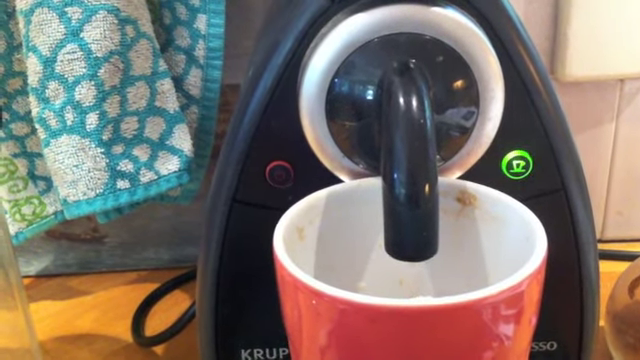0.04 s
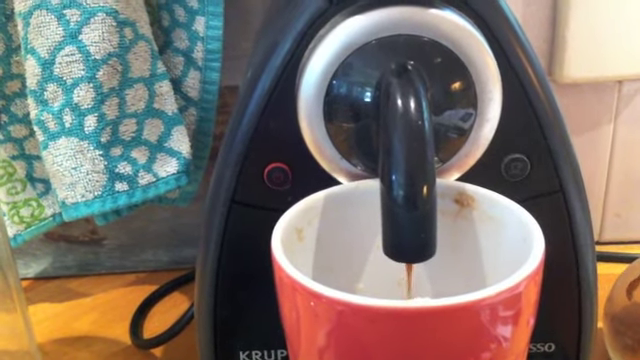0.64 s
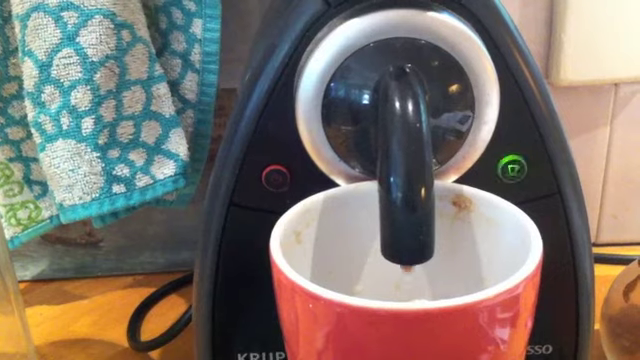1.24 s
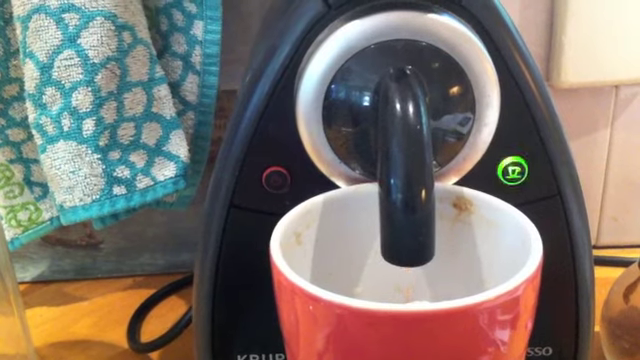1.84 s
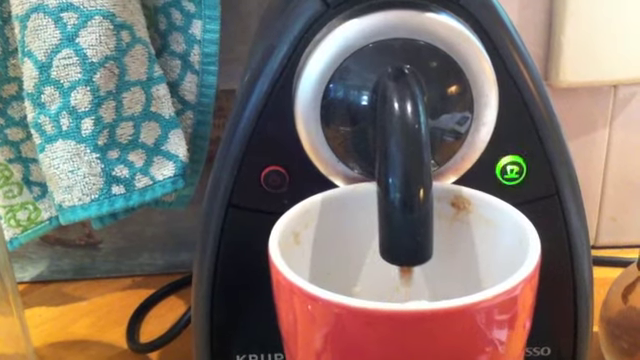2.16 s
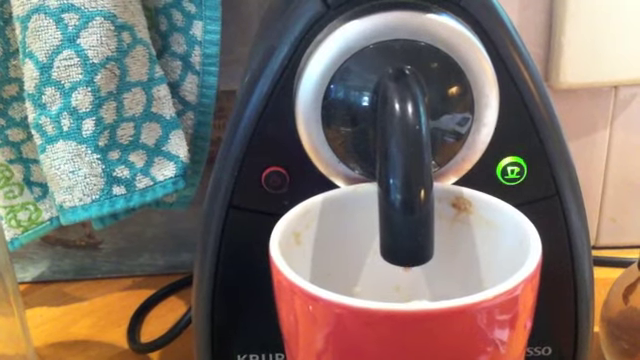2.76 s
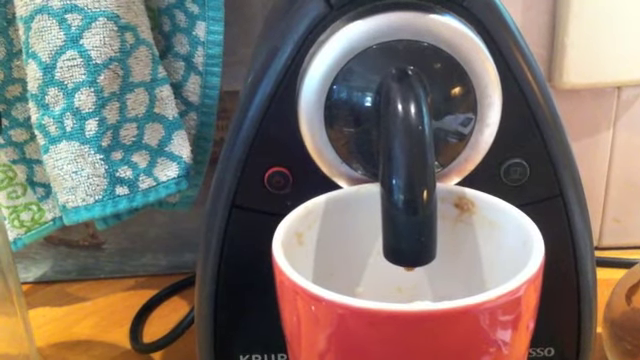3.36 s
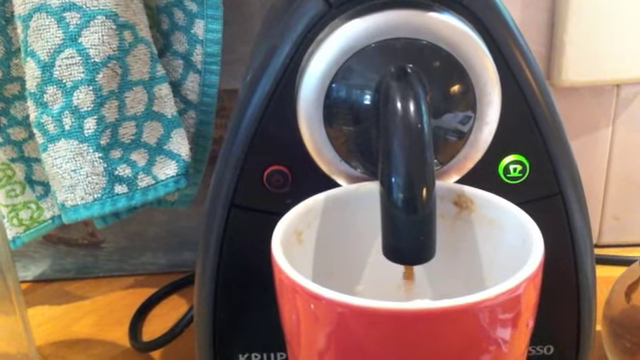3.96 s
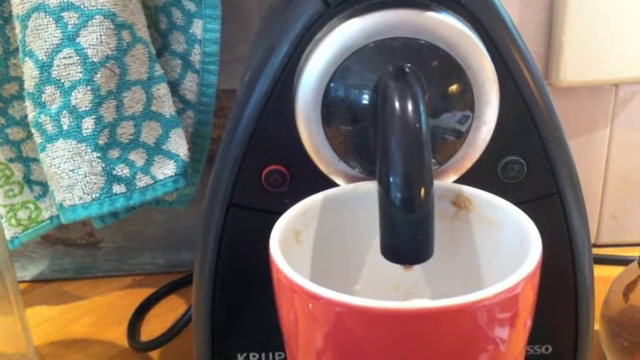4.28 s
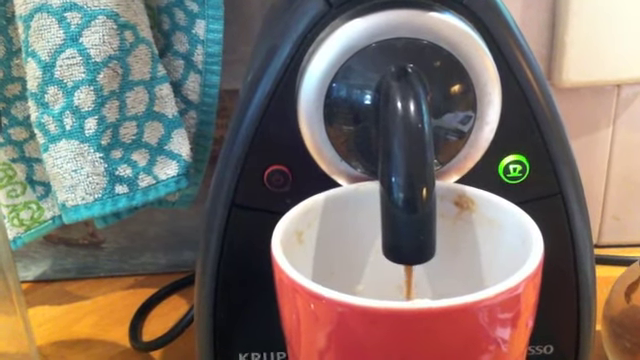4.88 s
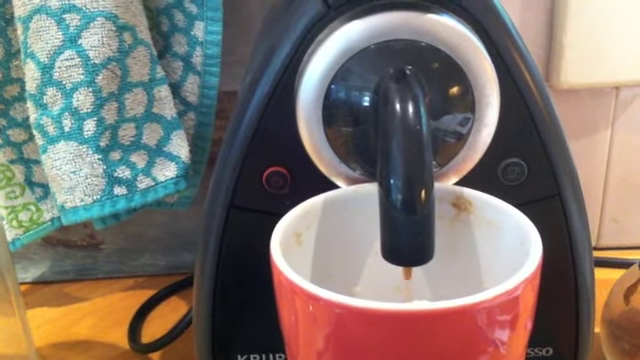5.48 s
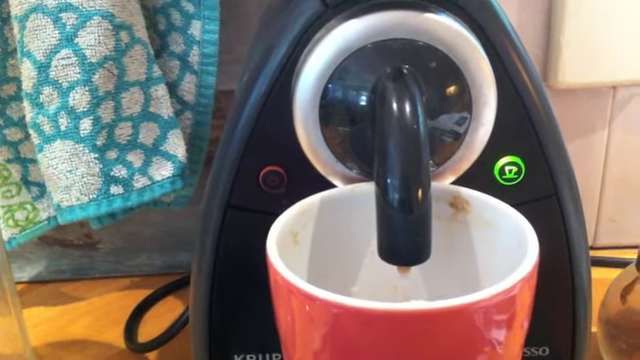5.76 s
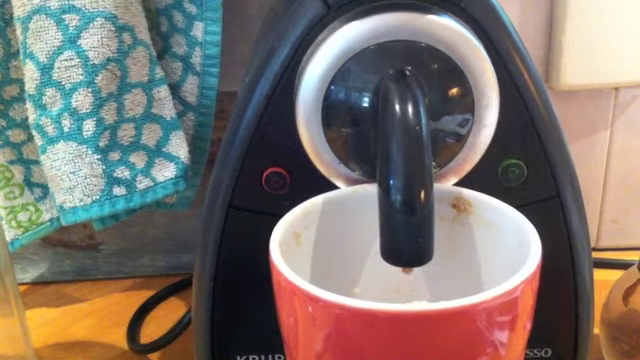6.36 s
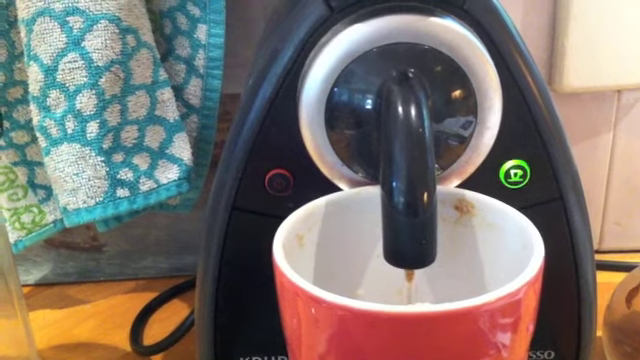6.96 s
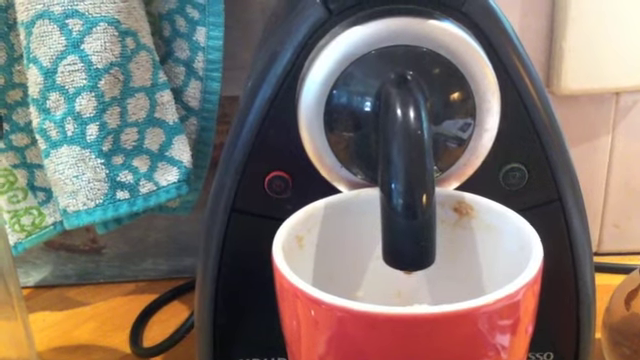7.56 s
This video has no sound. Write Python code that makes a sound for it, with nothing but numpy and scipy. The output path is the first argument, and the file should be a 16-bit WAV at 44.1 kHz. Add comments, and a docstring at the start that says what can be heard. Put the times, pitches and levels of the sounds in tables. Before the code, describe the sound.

A coffee machine pump hums and buzzes steadily while coffee drips into a china cup with small, irregular plinks.

```python
"""Capsule coffee machine in a kitchen

Close to the microphone, the vibrating pump strokes once per mains cycle: the casing hums and buzzes,
a drone grows with the pressure, and the piston rattles or, in bouts, knocks. Coffee dribbles into a
china cup: drops snap on the surface and trap small bubbles that ring briefly. The hose gurgles, and
quiet room tone lies behind it all."""
import sys
import numpy as np
from scipy import signal
from scipy.fft import rfft, irfft
from scipy.io import wavfile

SR = 44100
rng = np.random.default_rng(int(sys.argv[2]) if len(sys.argv) > 2 else 0)


def waveform_to_disk(signal):
    """Save audio, clipped to [-1, 1], as 16-bit WAV at the path in sys.argv[1]."""
    frames = np.transpose(np.atleast_2d(signal))
    scaled = np.clip(frames, -1, 1) * 32767
    samples = np.round(scaled).astype(np.int16)
    wavfile.write(sys.argv[1], SR, samples)


N = 340893
PUMP_HZ, TOP_HZ = 50.004, 15800

# the pump's spectral lines (multiple of the stroke rate, relative level [dB])
PUMP_LINES = [(1, -52), (2, -33.5), (3, -22.5), (4, -11.5), (5, -16.5), (6, 2), (7, -15), (8, -25.5),
              (9, -16), (10, -1.5), (11, -15.5), (12, -12.5), (13, -47), (14, -9), (15, -12.5), (16, -16.5),
              (17, -16), (18, -22), (19, -16.5), (20, -19), (21, -20), (22, -18), (23, -22), (24, -17),
              (25, -35), (26, -23), (27, -43), (28, -10.5), (29, -16.5), (30, -5.5), (31, -3.5), (32, -14)]


def pump():
    """The machine up close: every part follows the stroke while the pressure builds evenly."""
    t = np.arange(N) / SR
    phase = PUMP_HZ * t - .465  # in strokes
    pressure = np.linspace(.12, 1, N)  # share of its final value
    return (body_hum(t, phase, pressure) + side_panel(t, phase) + piston(t, phase)
            + casing_buzz(phase, pressure) + water_rush(phase))


def body_hum(t, phase, pressure):
    """The heavy body hums evenly through the cycle; its fourth line drones in step with the pressure."""
    ease_from_s, ease_db_per_s = 5.95, .9
    hum_gain = undb(-50.5 - ease_db_per_s * np.maximum(t - ease_from_s, 0))
    hum = tones(phase, [1, 2, 3, *range(5, 17)], odd_turn=.25) * waver(db=.14, rate_hz=12)
    drone = undb(-46) * pressure * tones(phase, [4])
    return hum_gain * hum + drone


def side_panel(t, phase):
    """A side panel swells once with each push, its lines all in step."""
    # how strongly the panel rings (time [s], relative level [dB])
    levels = [(0.0, -60), (0.62, -60), (1.37, -57.5), (2.34, -59.5), (3.02, -56), (3.39, -57.5),
              (4.03, -60.5), (4.89, -58), (5.96, -59), (6.67, -59), (7.25, -62), (7.51, -63.5),
              (7.7, -58.5)]
    gain = undb(np.interp(t, *np.transpose(levels)) - 1.1)
    return gain * unit(tones(phase, range(27, 33)))


def piston(t, phase):
    """The piston rattles loosely; in bouts it knocks once per stroke, just before mid-push."""
    rattle_gain, rattle_yields = undb(-63.5), .64  # this share gives way to a firm knock
    knock_lead = .0916  # share of a cycle before mid-push
    spectrum = [(order * PUMP_HZ, db) for order, db in PUMP_LINES]
    contacts = shifting_rattle(phase, rest_db=-11, shift=.4)
    loose = unit(band(colour(contacts, spectrum), 825, 1325))
    knock = unit(tones(phase + knock_lead, range(17, 27)))
    strength = knock_strength(t)
    firmness = np.minimum(strength / rattle_gain, 1)
    return rattle_gain * (1 - rattle_yields * firmness) * loose + strength * knock


def knock_strength(t):
    """Each bout of knocking sets in, sags slowly and stops abruptly."""
    # bouts in which the piston knocks (start [s], end [s], attack [s], level [dB])
    bouts = [(.8, 1.86, 0.6, -57), (1.88, 6.1, .1, -58.2), (6.98, 7.22, 0.099, -59)]
    release_s, sag_db_per_s = .045, .74
    strength = np.zeros(N)
    for start, end, attack, db in bouts:
        gate = np.clip(np.minimum((t - start) / attack, (end - t) / release_s), 0, 1)
        strength += gate * undb(db - sag_db_per_s * (t - start))
    return strength


def casing_buzz(phase, pressure):
    """The plastic casing buzzes, a little louder under pressure; its treble pulses less than its mids."""
    # spectrum of the buzz (frequency [Hz], relative level [dB])
    spectrum = [(1600, -7), (1850, -1), (2000, 4), (2070, -6), (2300, 1.5), (2540, -6.5), (2850, -5),
                (3100, -7), (3700, -11.5), (4150, -13.5), (4350, -14), (5600, -9.5), (5950, -22.5),
                (6350, -7), (7000, -31), (9300, -22.5), (15500, -47)]
    # sharp resonances of the casing (frequency [Hz], width [Hz], boost [dB])
    resonances = [(1700, 27, 9.5), (1800, 15, 7), (2650, 10, 8.5), (2800, 25, 8.5), (2950, 110, 5),
                  (3550, 12, 0.5), (4760, 39, 13), (10600, 220, 10), (11200, 170, 7)]
    clatter = band(shifting_rattle(phase, rest_db=0, shift=.5), 1625, 3325)
    fizz = band(shifting_rattle(phase, rest_db=7, shift=.7), 3325, TOP_HZ)
    gain = undb(-59 + 1.75 * (pressure - 1))
    return gain * unit(boost(colour(clatter + fizz, spectrum), resonances))


def water_rush(phase):
    """Water rushes through the valve, harder with each push."""
    # flow noise (frequency [Hz], density [dB per Hz])
    spectrum = [(100, -125), (450, -99), (900, -99), (1250, -104), (1500, -97), (1750, -101), (2000, -99.5),
                (2450, -105), (2750, -101), (3250, -110), (4300, -107.5), (5700, -110), (6400, -107),
                (10000, -120)]
    return hiss(spectrum) * unit(stroke(phase, rest_db=5))


def tones(phase, orders, odd_turn=0):
    """Clean pump lines; the odd ones may lead the even ones by a share of a turn."""
    return sum(undb(PUMP_LINES[k - 1][1]) * np.sin(2 * np.pi * (k * phase + odd_turn * (k % 2)))
               for k in orders)


def stroke(phase, rest_db):
    """Force over one pump cycle: stronger while the piston drives, weaker while it returns."""
    from_mid_push = (phase + .5) % 1 - .5
    return undb(rest_db) + np.exp(-(from_mid_push / .24) ** 6)


def rattle(phase, rest_db, size=4096):
    """One random burst of contacts, repeated on every stroke, with all its harmonics equally strong."""
    grid = np.arange(size) / size
    cycle = rng.standard_normal(size)
    below_top = np.arange(size // 2 + 1) * PUMP_HZ < TOP_HZ
    for _ in range(2):  # shape by the stroke, then flatten the spectrum
        angles = np.angle(rfft(cycle * stroke(grid, rest_db)))
        cycle = irfft(below_top * np.exp(1j * angles))
    return unit(np.interp(phase, grid, cycle, period=1))


def shifting_rattle(phase, rest_db, shift):
    """The rattle changes gradually, and quickly whenever the piston slips into a new seat."""
    # slips of the piston (start [s], end [s])
    slips = [(1.78, 1.92), (3.56, 3.76), (6.02, 6.14), (7.0, 7.2)]
    t = np.arange(N) / SR
    seats_s = [0, *np.ravel(slips), t[-1]]
    out = rattle(phase, rest_db)
    for weight in np.eye(len(seats_s)):  # crossfade from seat to seat
        out += shift * np.interp(t, seats_s, weight) * rattle(phase, rest_db)
    return out


def drips():
    """Each drop snaps on the surface and rings the cup; its bubble pinches off and sings a rising note."""
    # drops landing (time [s], relative snap level [dB], bubble delay [s], bubble pitch [Hz],
    # bubble t60 [s], relative bubble level [dB])
    drops = [(0.4038, -39, 0, 4200, .005, -60), (0.615, -36.5, 0.0035, 4800, .003, -44),
             (0.8564, -36, 0, 6420, 0.0048, -48), (0.8684, -36, 0.0011, 2200, 0.0093, -36),
             (1.0464, -46, 0, 4150, .005, -65), (1.971, -37.5, .007, 2060, .01, -37),
             (2.2106, -54, 0, 1390, 0.021, -36.5), (2.4433, -37, .014, 2180, .015, -38),
             (2.642, -35, 0.011, 1730, 0.011, -31.5), (2.8495, -41.5, 0.0036, 6750, 0.0026, -45.5),
             (3.084, -26, 0, 2090, 0.011, -26.5), (3.2951, -50, 0.0012, 1380, .018, -47),
             (3.5086, -27.5, 0, 2700, 0.015, -39), (3.6899, -40, 0.0089, 1650, .01, -32.5),
             (3.9016, -33, 0.0098, 1510, .03, -42.5), (4.388, -21.5, 0.0018, 2920, 0.0095, -27.5),
             (4.395, -42.5, 0.0016, 1506, 0.039, -37.5), (4.6231, -35.5, 0.0017, 4640, 0.0074, -47.5),
             (4.858, -36, 0.00063, 1720, .007, -33.5), (5.066, -52, 0.0011, 2070, .006, -40),
             (6.0588, -31, 0.00086, 4400, .005, -41), (6.302, -58, 0, 1850, 0.0055, -40.5),
             (6.753, -33.5, 0.0062, 1450, 0.017, -36), (6.9563, -50, 0.0011, 1690, 0.0053, -27.5),
             (7.2494, -50, 0, 3680, .005, -55), (7.4877, -39, 0.0078, 2145, 0.0025, -34.5)]
    # what a snap rings with inside the cup (frequency [Hz], t60 [s], relative level [dB])
    cup_modes = [(2100, 0.0018, 1.5), (2820, 0.016, 7), (3610, 0.013, 2.5), (4390, 0.003, 5.5),
                 (6200, 0.0028, 8), (7720, 0.0019, 8.5), (8600, .0035, -12), (11000, 0.00054, -38)]
    # how the cup passes the drips on (frequency [Hz], gain [dB])
    cup_colour = [(950, 0), (1170, -7), (1400, 0), (3200, 0), (4400, 3), (5400, -2), (6300, 1), (8500, 1),
                  (9800, -6), (15500, -5)]
    cup = sum(undb(db) * ring(hz, t60) for hz, t60, db in cup_modes)
    cup /= np.linalg.norm(cup)
    cup_air = undb(-27) * ring(hz=970, t60=.084)
    out = np.zeros(N)
    for s, snap_db, delay_s, hz, t60, bubble_db in drops:
        snap = highpass(cup, .63 * hz, order=2)  # a smaller drop snaps brighter
        pinch_off = undb(-3) * snap
        bubble = ring(hz, t60, glide=.025) + cup_air + pinch_off
        add(out, s, undb(snap_db + 7.5) * snap)
        add(out, s + delay_s, undb(bubble_db + 3) * bubble)
    return colour(highpass(out, 780, order=4), cup_colour)  # such small sources radiate almost no bass


def in_cup(x):
    """The direct sound reaches the microphone with its first echoes just behind."""
    # echoes off the cup wall and the spout (delay [s], gain [ratio])
    echoes = [(.0012, 0.087), (.0041, .1)]
    out = x.copy()
    for delay_s, gain in echoes:
        add(out, delay_s, gain * x)
    return out


def hose():
    """Air pockets gulp through the narrow hose."""
    # low gurgles (time [s], pitch [Hz], t60 [s], level [dB])
    gurgles = [(4.025, 430, 0.044, -44), (4.041, 567, .03, -45), (4.13, 368, .08, -49),
               (4.211, 415, .08, -58.5), (4.31, 380, .07, -53.5)]
    out = np.zeros(N)
    for s, hz, t60, db in gurgles:
        add(out, s, undb(db) * ring(hz, t60, glide=.065))
    return highpass(out, 250, order=2)


def reflections(x, t60, db, gap_s):
    """Dense echoes off the surroundings start after a short gap and die away."""
    t = np.arange(SR // 2) / SR
    tail = rng.standard_normal(len(t)) * np.exp(-np.log(1000) * t / t60) * (t > gap_s)
    return undb(db) * signal.fftconvolve(x, tail / np.linalg.norm(tail))[:N]


def room_tone():
    """The kitchen's low rumble and a steady hiss."""
    # background noise (frequency [Hz], density [dB per Hz])
    spectrum = [(25, -111), (50, -116), (90, -105), (120, -101), (170, -93), (300, -93.5), (420, -99),
                (700, -103), (3000, -109), (8000, -111), (10500, -115), (15500, -114)]
    return hiss(spectrum)


def undb(db):
    """Decibels to amplitude."""
    return 10 ** (np.asarray(db) / 20)


def unit(x):
    """Scale to rms 1."""
    return x / np.sqrt(np.mean(x ** 2))


def colour(x, points):
    """Filter by a spectrum of (frequency [Hz], gain [dB]) points."""
    hz, db = np.transpose(points)
    f = np.fft.rfftfreq(len(x), 1 / SR)
    return irfft(rfft(x) * undb(np.interp(np.log(f + 1), np.log(hz), db)), len(x))


def band(x, lo, hi):
    """The part of x between two frequencies, with soft edges."""
    f = np.fft.rfftfreq(len(x), 1 / SR)
    return irfft(rfft(x) * (np.tanh((f - lo) / 10) - np.tanh((f - hi) / 10)) / 2, len(x))


def highpass(x, hz, order):
    """Roll off below hz."""
    return signal.sosfilt(signal.butter(order, hz, "high", fs=SR, output="sos"), x)


def boost(x, modes):
    """Lift x at each resonance (frequency [Hz], width [Hz], boost [dB])."""
    f = np.fft.rfftfreq(len(x), 1 / SR)
    gain = 1 + sum((undb(db) - 1) / (1 + (2 * (f - hz) / width) ** 2) for hz, width, db in modes)
    return irfft(rfft(x) * gain, len(x))


def ring(hz, t60, glide=0):
    """A struck resonance whose pitch can glide upward while it dies."""
    t = np.arange(SR // 10) / SR
    age = t / t60
    turns = hz * t * (1 + glide * np.minimum(age, 1) / 2)
    return np.exp(-np.log(1000) * age) * np.sin(2 * np.pi * turns)


def hiss(points):
    """Noise with a spectrum of (frequency [Hz], density [dB per Hz]) points."""
    return np.sqrt(SR / 2) * colour(rng.standard_normal(N), points)


def waver(db, rate_hz):
    """A gain that wanders slowly around 1."""
    return undb(db * unit(band(rng.standard_normal(N), -rate_hz, rate_hz)))


def add(out, s, sound):
    """Mix a sound in at time s."""
    i = int(s * SR)
    out[i:i + len(sound)] += sound[:N - i]


def scene():
    """One microphone near machine and cup; the drips echo off the worktop and, farther off, the room."""
    drops = in_cup(drips())
    worktop = reflections(drops, t60=.032, db=-10, gap_s=.0022)
    kitchen = reflections(drops, t60=.21, db=-15, gap_s=.0044)
    return (pump() + drops + worktop + kitchen + hose() + room_tone())[None]


def record(dry):
    """The recorder cuts the top steeply."""
    return signal.sosfilt(signal.ellip(10, .1, 70, TOP_HZ, fs=SR, output="sos"), dry)


dry = scene()
out = record(dry)
waveform_to_disk(out)
```